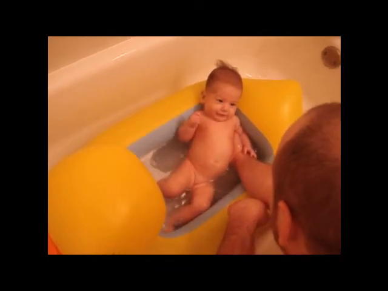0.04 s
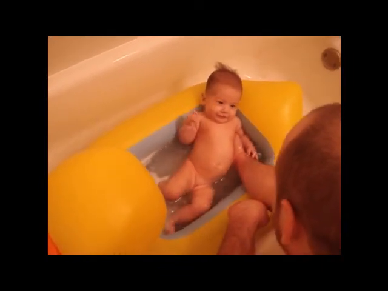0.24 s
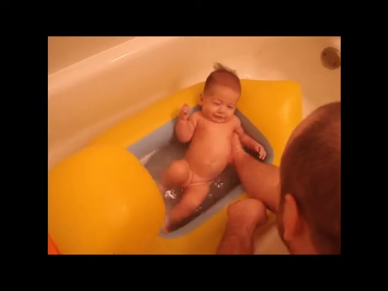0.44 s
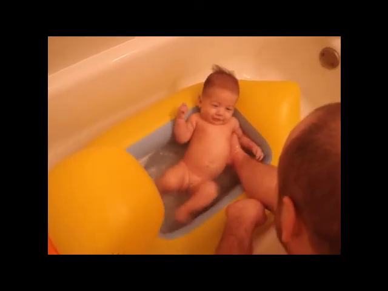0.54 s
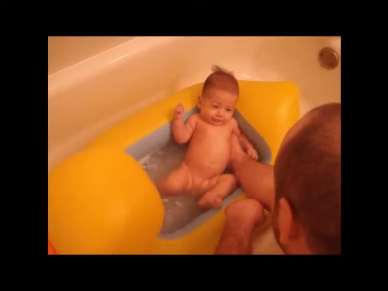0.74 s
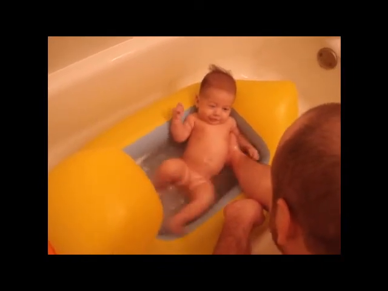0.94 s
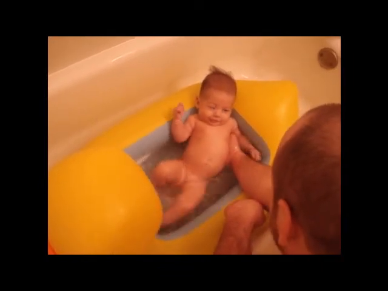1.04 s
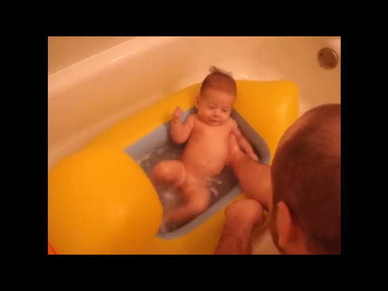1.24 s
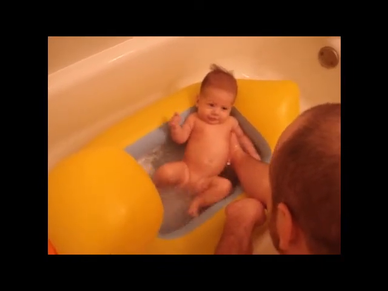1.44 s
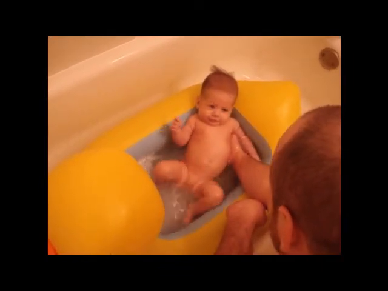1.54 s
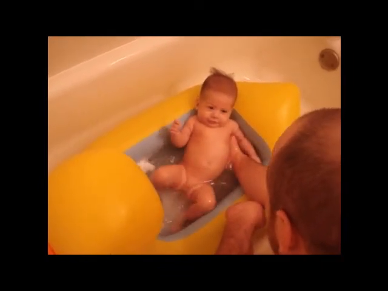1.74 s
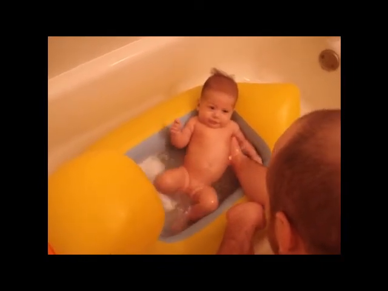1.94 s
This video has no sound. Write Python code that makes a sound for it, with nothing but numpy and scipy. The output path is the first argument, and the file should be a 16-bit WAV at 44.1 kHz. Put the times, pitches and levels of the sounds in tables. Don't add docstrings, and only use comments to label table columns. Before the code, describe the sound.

Small kicks stir bath water, first faintly, then with sharper splashes and a cluster of bubbling plops; a brief vinyl squeak and scattered droplets follow. Close microphone, short tiled-room echo, soft hiss, dull treble.

```python
import sys
import numpy as np
from scipy import signal
from scipy.fft import rfft, irfft
from scipy.io import wavfile

SR = 44100
rng = np.random.default_rng(int(sys.argv[2]) if len(sys.argv) > 2 else 0)


def transcribe(u):
    v = np.clip(np.atleast_2d(u).T, -1, 1)
    q = np.round(v * 32767).astype(np.int16)
    wavfile.write(sys.argv[1], SR, q)


def convert_level_to_amplitude(level_db):
    exponent = np.asarray(level_db, float) / 20
    return 10 ** exponent


N = 88200


def rms_one(x):
    return x / np.sqrt(np.mean(x ** 2) + 1e-20)


def resonance(x, hz, width_hz):
    r = np.exp(-np.pi * width_hz / SR)
    edge = (1 - r * r) / 2
    return signal.lfilter([edge, 0, -edge], [1, -2 * r * np.cos(2 * np.pi * hz / SR), r * r], x + 1e-18)


def highpass(x, order, hz):
    return signal.sosfilt(signal.butter(order, hz, "high", fs=SR, output="sos"), x)


def drift(rate_hz, size):
    r = np.exp(-2 * np.pi * rate_hz / SR)
    settle = 8000
    wander = signal.lfilter([1], [1, -2 * r, r * r], rng.standard_normal(size + settle))
    return rms_one(wander[settle:])


def add(out, start_s, x):
    i = int(start_s * SR)
    out[i:i + len(x)] += x[:N - i]


def plops():
    # start in seconds, peak in dB, pitch in Hz,
    # t60 in seconds.
    bubbles = [(0.191, -45.5, 2200, 0.022), (0.591, -48, 1150, 0.017), (0.679, -40, 1400, 0.012),
               (0.705, -35.5, 2065, 0.016), (0.806, -24, 1510, 0.0072), (0.919, -39, 2210, 0.018),
               (0.984, -36.5, 2600, 0.02), (1.017, -50, 3120, 0.024), (1.094, -21, 2670, 0.041),
               (1.165, -19, 2410, 0.0077), (1.224, -29.5, 3130, 0.023), (1.234, -16.5, 1010, 0.015),
               (1.256, -15, 1010, 0.014), (1.264, -21, 1080, 0.008), (1.286, -26, 3200, 0.012),
               (1.305, -18, 1360, 0.034), (1.306, -21.5, 1608, 0.056), (1.331, -20, 1346, 0.024),
               (1.43, -27.5, 790, 0.022), (1.47, -23.5, 740, 0.014), (1.573, -34, 2490, 0.022),
               (1.734, -38, 834, 0.027), (1.779, -37.5, 2950, 0.043), (1.825, -23, 3150, 0.025),
               (1.889, -29, 2400, 0.021),
               (1.233, -15.5, 850, 0.01), (1.238, -23.5, 1630, 0.024), (1.329, -18.5, 773, 0.038),
             (1.5, -33.5, 720, 0.025), (1.445, -34, 950, 0.059), (1.887, -41, 1580, 0.036),
             (1.225, -40, 267, 0.066), (1.247, -24.5, 1800, .025), (1.268, -31, 2700, 0.035),
             (1.255, -28.5, 3200, 0.038), (1, -45, 2100, 0.0064), (0.84, -38, 3900, .015),
             (0.804, -26, 690, 0.0077), (1.8, -44, 3600, 0.017), (1.2, -34, 2030, 0.0083),
             (1.102, -30, 2400, 0.015), (1.833, -31, 3350, 0.029), (1.897, -39, 2350, 0.017),
             (1.274, -27, 1200, 0.037), (1.243, -21.5, 995, 0.019)]
    rise, onset_s = 0.13, 0.00079
    froth_db, froth_width, froth_lasts = -5.5, 0.32, 1.34
    out, t = np.zeros(N), np.arange(SR // 8) / SR
    for start_s, db, hz, t60 in bubbles:
        climb = t + rise * t ** 2 / t60 / 2
        ring = np.sin(2 * np.pi * hz * climb) * convert_level_to_amplitude(-60 * t / t60)
        froth = resonance(rng.standard_normal(len(t)), hz, froth_width * hz)
        froth = rms_one(resonance(froth, hz, froth_width * hz))
        froth = convert_level_to_amplitude(froth_db - 60 * t / (t60 * froth_lasts)) * froth
        add(out, start_s, convert_level_to_amplitude(db) * (ring + froth) * (1 - np.exp(-t / onset_s)))
    return out


def cracks():
    # start in seconds, peak in dB, pitch in Hz, t60 in seconds.
    slaps = [(0.8044, -27, 1500, .003), (0.8047, -26, 4000, .002), (0.66, -51, 1410, .12),
             (1.31, -34, 2950, 0.033), (1.2333, -21.5, 1180, 0.0033), (1.2502, -13, 1300, 0.0051),
             (1.2507, -15.5, 4500, 0.0022), (1.2565, -25.5, 2080, 0.0066), (1.2586, -23, 3170, .005),
             (1.2655, -19.5, 1093, 0.018), (1.287, -28, 3190, .015), (1.3115, -23.5, 1665, 0.056),
             (1.319, -23.5, 1620, 0.009), (1.325, -23.5, 1358, 0.075), (1.333, -20, 1130, 0.0084),
             (1.3353, -19.5, 1230, 0.0043), (1.3394, -22.5, 1520, .006), (1.407, -37.5, 3470, 0.026),
             (1.428, -38, 1560, 0.033), (1.449, -33, 4420, 0.019), (1.45, -29, 7600, .004),
             (1.442, -36, 1106, 0.025), (1.46, -34, 690, .03), (1.494, -37, 2450, .02),
             (1.507, -36.5, 2450, 0.035), (1.575, -41, 2205, 0.034), (1.586, -39, 2470, .02),
             (1.676, -44.5, 3100, 0.022), (1.741, -45, 1990, 0.028), (1.6, -45.5, 2405, .05),
             (1.67, -38.5, 1690, .025), (1.8254, -32, 3030, 0.046), (1.8293, -30, 3304, 0.027),
             (1.8537, -37.5, 3220, 0.026), (1.896, -37.5, 2310, 0.028), (1.915, -43, 2320, 0.027),
             (1.345, -32.5, 759, 0.064), (1.375, -38.5, 745, 0.057), (1.40, -40, 578, 0.052),
             (1.1412, -21.5, 2500, 0.002), (1.02, -42.5, 3010, 0.044), (1.03, -48, 1640, 0.06),
             (1.07, -46.5, 1360, .04), (0.82, -39, 1610, .04), (1.52, -37, 2640, 0.031),
             (1.527, -38, 742, 0.047)]
    rise = 0.023
    out, t = np.zeros(N), np.arange(SR // 8) / SR
    for start_s, db, hz, t60 in slaps:
        climb = t + rise * t ** 2 / t60 / 2
        add(out, start_s, convert_level_to_amplitude(db - 60 * t / t60) * np.sin(2 * np.pi * hz * climb))
    return out


def droplets(per_s, centre_hz, octaves, cycles, size):
    pitches, spread_db, mist_db = 14, 3.0, -7
    patch_db, patches_per_s = 4, 29
    sizes = convert_level_to_amplitude(spread_db * np.minimum(rng.exponential(1, size), 3)) * rng.choice([-1, 1], size)
    born = rng.random(size) < per_s / SR
    dealt = rng.integers(0, pitches, size)
    mist = convert_level_to_amplitude(mist_db) * rng.standard_normal(size) * np.sqrt(per_s / SR / pitches)
    steps = int(size / SR * 60) + 2
    clumps = np.clip(rng.standard_normal((pitches, steps)), -3, 1.2)
    clump_time = np.arange(size) / SR * patches_per_s
    total = 0
    for k, step in enumerate(np.linspace(-2, 2, pitches)):
        hz = np.clip(centre_hz * 2 ** (step * octaves / 2), 100, 10200)
        patch = convert_level_to_amplitude(patch_db * np.interp(clump_time, np.arange(steps), clumps[k]))
        hits = sizes * born * (dealt == k) + np.roll(mist, 97 * k)
        rung = resonance(patch * hits, hz, 2.26 * hz / cycles)
        total = total + np.exp(-step ** 2 / 2) * resonance(rung, hz, hz / 2) / np.sqrt(hz)
    return rms_one(total)


def sprays():
    # start in seconds, level in dB, hold in seconds, centre in Hz,
    # width in octaves.
    bursts = [(0.59, -53, 0.019, 3740, 3.2), (0.696, -50.5, 0.09, 1810, 1.47),
              (0.757, -44, 0.02, 5430, 0.87), (0.804, -44, 0.024, 1700, 1.61),
              (0.84, -42, 0.012, 4560, 0.44), (0.918, -44.5, 0.011, 3240, 2.4),
              (0.985, -47.5, 0.038, 6870, 0.82), (1.08, -41, 0.036, 3940, 0.94),
              (1.133, -38, 0.052, 5740, 1.5), (1.163, -39, 0.011, 2200, 0.83),
              (1.232, -34.5, 0.037, 2620, 1.38), (1.245, -35, 0.0089, 4080, 3.9),
              (1.291, -35, 0.02, 3960, 2.16), (1.314, -35.5, 0.024, 1510, 0.3),
              (1.407, -46, 0.032, 2610, 1.48), (1.447, -38.5, 0.032, 5630, 1.9),
              (1.488, -47, 0.035, 2440, 0.29), (1.57, -44, 0.0034, 4500, 2.3),
              (1.591, -41.5, 0.025, 5520, 0.67), (1.731, -44.5, 0.0054, 2560, 3.1),
              (1.821, -46, 0.029, 3900, 0.94), (1.948, -55, 0.034, 2750, 3.4),
              (0.564, -57.5, 0.034, 3550, 2.6)]
    # start in seconds,
    # level in dB, hold in seconds, centre in Hz, width in octaves.
    sloshes = [
        (0.81, -49.5, 0.027, 350, 1.23),
        (1.134, -47, 0.093, 575, 1.48),
        (1.245, -46, 0.043, 603, 0.5),
        (1.34, -49, 0.088, 5800, 0.64),
        (1.472, -48, 0.029, 251, 0.5),
        (1.733, -55.5, 0.012, 287, 0.29),
        (0.675, -55, 0.037, 5400, 1.05),
        (1.735, -52.5, 0.046, 6200, 0.39),
        (0.806, -45, 0.023, 7000, 0.71),
    ]
    attack_s, t60_s = 0.00077, 0.17
    out, t = np.zeros(N), np.arange(SR // 4) / SR
    for start_s, db, hold_s, hz, octaves in [*bursts, *sloshes]:
        shape = (1 - np.exp(-t / attack_s)) * convert_level_to_amplitude(-60 * np.maximum(t - hold_s, 0) / t60_s)
        fizz = droplets(per_s=4000, centre_hz=hz, octaves=np.clip(octaves, .1, 3), cycles=6.7, size=len(t))
        add(out, start_s, convert_level_to_amplitude(db) * shape * fizz)
    return out


def squeaks():
    # start in seconds, length in seconds, level in dB, then start, middle and end pitch in Hz.
    slips = [
        (1.490, .056, -39, 735, 885, 735),
        (1.667, .05, -51, 860, 850, 835),
        (0.388, .1, -61, 522, 515, 495),
        (0.49, .085, -57, 440, 380, 368),
    ]
    overtones_db = [(-20, -11), (0, -18), (-14, -20), (-14, -20)]
    roughness = .45
    out = np.zeros(N)
    for (start_s, length_s, db, *path_hz), over_db in zip(slips, overtones_db):
        t = np.arange(int(length_s * SR)) / SR
        u = t / length_s
        phase = 2 * np.pi * np.cumsum(np.interp(u, [0, .5, 1], path_hz)) / SR
        tone = 0
        for k, partial_db in enumerate([0, *over_db]):
            waver = np.interp(u, np.linspace(0, 1, 3000), drift(380, size=3000))
            tone = tone + convert_level_to_amplitude(partial_db) * (1 + roughness * waver) * np.sin((k + 1) * phase)
        add(out, start_s, convert_level_to_amplitude(db) * np.sqrt(2) * tone * np.sin(np.pi * u ** .7) ** .3)
    return out


def bump():
    rise_s, fall_s, swing_hz = .0006, .016, 19
    out, t = np.zeros(N), np.arange(SR // 4) / SR
    push = (1 - np.exp(-t / rise_s)) * np.exp(-t / fall_s)
    add(out, 1.1425, convert_level_to_amplitude(-24.5) * push * np.cos(2 * np.pi * swing_hz * t))
    return out


def bathroom(x):
    t60_s, wall_cut_hz, first_echo_s = 0.31, 3040, 0.0034
    t = np.arange(SR // 2) / SR
    noise = rng.standard_normal(len(t))
    low = signal.sosfilt(signal.butter(2, wall_cut_hz, fs=SR, output="sos"), noise)
    tail = low * convert_level_to_amplitude(-60 * t / t60_s) + (noise - low) * convert_level_to_amplitude(-120 * t / t60_s)
    tail = tail * np.clip(t / first_echo_s - 1, 0, 1)
    return signal.fftconvolve(x, tail / np.sqrt(np.sum(tail ** 2)))[:N]


def air():
    # frequency in Hz, level in dB per Hz.
    hiss_colour = [(15, -50.5), (25, -34.5), (103, -19), (139, -11.5), (175, -21), (506, -23.5),
                   (2250, -32.5), (2490, -29), (10500, -36), (13600, -90), (22000, -120)]
    # time in seconds, level in dB.
    foam = [(0, -3), (.05, -5), (.14, 0), (.36, 0), (.41, -4), (.48, -2), (.56, 0)]
    # time in seconds, level in dB.
    drone_level = [(0.0, -72), (0.05, -47), (0.24, -69), (0.27, -51.5), (0.61, -58.5), (0.66, -48.5),
                   (0.78, -57.5), (0.83, -47.5), (0.91, -77), (0.96, -51), (1.09, -61.5), (1.15, -52),
                   (1.44, -57), (1.47, -50.5), (1.69, -64.5), (1.73, -46.5), (1.89, -64), (2.0, -52.5)]
    t = np.arange(N) / SR
    hz = np.maximum(np.fft.rfftfreq(N, 1 / SR), 1)
    colour_hz, colour_db = np.transpose(hiss_colour)
    colour = convert_level_to_amplitude(np.interp(np.log(hz), np.log(colour_hz), colour_db))
    hiss = irfft(rfft(rng.standard_normal(N)) * colour, N)
    fine = signal.sosfiltfilt(signal.butter(2, 2800, "high", fs=SR, output="sos"), hiss)
    hiss = hiss + fine * (convert_level_to_amplitude(np.interp(t, *np.transpose(foam))) - 1)
    hiss = convert_level_to_amplitude(-53) * rms_one(hiss) * convert_level_to_amplitude(1.0 * drift(20, size=N))
    drone_hz = 146 + 8 * drift(25, size=N)
    drone = np.sqrt(2) * np.sin(2 * np.pi * np.cumsum(drone_hz) / SR)
    drone_db = np.interp(t, *np.transpose(drone_level)) + 1.6 * drift(38, size=N)
    lapping = droplets(per_s=400, centre_hz=1526, octaves=1.68, cycles=7.1, size=N)
    return hiss + convert_level_to_amplitude(drone_db) * drone + convert_level_to_amplitude(-66.5) * lapping


def scene():
    water = highpass(plops() + sprays() + cracks(), 2, 150)
    vinyl = highpass(squeaks(), 4, 280)
    wet = convert_level_to_amplitude(-8) * bathroom(water + convert_level_to_amplitude(-8) * vinyl)
    return (water + vinyl + wet + bump() + air())[None]


def band_limit(x):
    return signal.sosfilt(signal.butter(12, 10930, fs=SR, output="sos"), x)


def record(dry):
    rounded = .4 * np.tanh(dry / .4)
    cut = signal.sosfilt(signal.ellip(10, .5, 70, 10000, fs=SR, output="sos"), rounded)
    return band_limit(cut)


dry = scene()
out = record(dry)
transcribe(out)
```